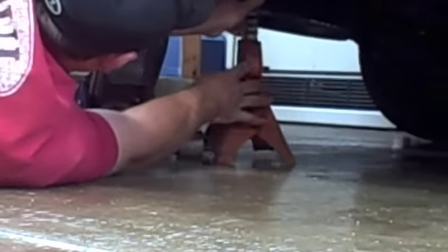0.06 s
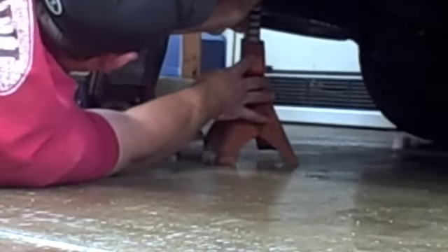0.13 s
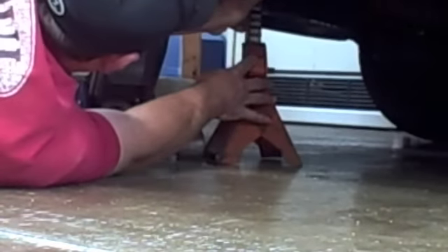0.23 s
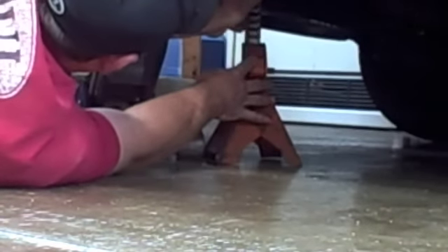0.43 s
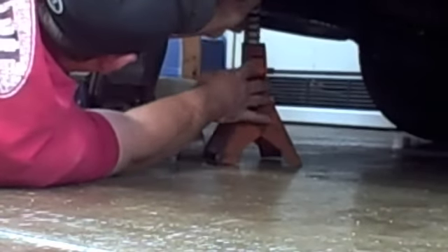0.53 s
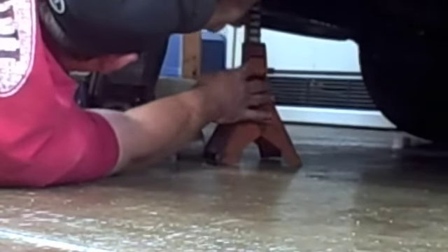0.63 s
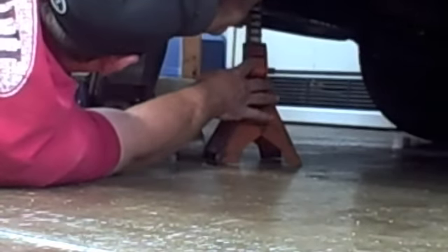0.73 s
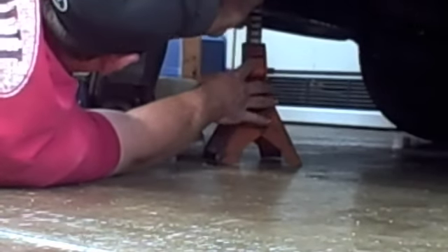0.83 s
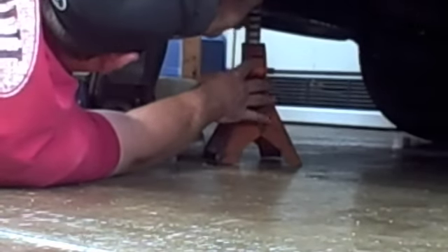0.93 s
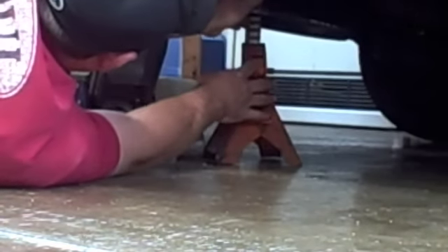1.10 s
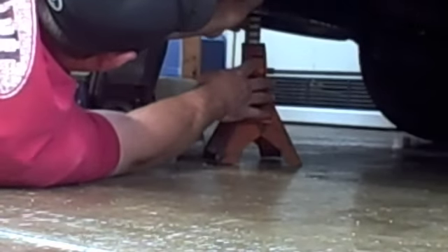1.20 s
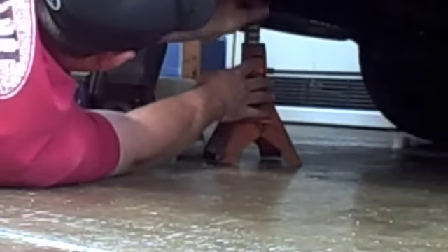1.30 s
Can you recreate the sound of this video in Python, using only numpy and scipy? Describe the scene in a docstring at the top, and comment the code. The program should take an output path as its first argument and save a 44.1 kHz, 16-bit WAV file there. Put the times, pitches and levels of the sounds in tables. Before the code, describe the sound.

Close, slightly distorted sound of a metal stand adjusted by hand in an echoing garage: foot knock, short groan and pawl clicks, a harsh ringing clank, then gritty scuffs, faint squeaks and a final knock.

```python
"""A concrete garage: a steel jack stand is set on the floor by hand, beside a microphone that overloads.
The pawl clicks, the notched post drops with one loud rattling clank, and the frame knocks and scuffs
on the floor as it is nudged into place. Steel parts ring as sums of decaying modes; clatter, thuds,
slides and scuffs are shaped noise; squeaks and groans are wavering tones. Decaying noise forms the
garage's reflections, which ring on over a quiet room tone."""
import sys
import numpy as np
from scipy import signal
from scipy.fft import rfft, irfft
from scipy.io import wavfile
from scipy.ndimage import uniform_filter1d

SR = 44100
rng = np.random.default_rng(int(sys.argv[2]) if len(sys.argv) > 2 else 0)


def master(y):
    """Save y as 16-bit WAV."""
    cut = np.clip(np.atleast_2d(y).T, -1, 1)
    pcm = np.round(cut * 32767)  # scale
    wavfile.write(sys.argv[1], SR, pcm.astype(np.int16))


N = 59535
TIME, HZ = np.arange(N) / SR, np.fft.rfftfreq(N, 1 / SR)


def amp(db):
    """Decibels to gain."""
    return 10 ** (np.asarray(db) / 20)


def unit(x):
    """Scales to rms 1."""
    return x / np.sqrt(np.mean(x ** 2) + 1e-20)


def read(points, hz):
    """Reads a table on a log-frequency axis."""
    f, value = np.transpose(points)
    return np.interp(np.log(hz + 1), np.log(f + 1), value)


def add(mix, start_s, sound):
    """Mixes a sound in at its start time."""
    part = mix[max(round(start_s * SR), 0):][:len(sound)]
    part += sound[:len(part)]


def noise(spectrum, tilt_db=0):
    """Random-phase noise of rms 1 with the given spectrum, tilted per octave above 500 Hz."""
    tilt = tilt_db * np.log2(np.maximum(HZ, 500))
    gain = amp(read(spectrum, HZ) + tilt)
    phase = 2 * np.pi * rng.random(len(HZ))
    return unit(irfft(gain * np.exp(1j * phase), N))


def fade(t, t60):
    """Free decay, 60 dB in t60 seconds."""
    return np.exp(-np.log(1000) * t / np.maximum(t60, 1e-3))


def die_away(x, t60s):
    """Lets each frequency band decay at its own speed."""
    hz, t, bands = signal.stft(x, SR, nperseg=256)
    bands = bands * fade(t, read(t60s, hz)[:, None])
    return signal.istft(bands, SR, nperseg=256)[1][:N]


def stroke(start_s, length_s):
    """The swell and fall of one short push."""
    progress = np.clip((TIME - start_s) / length_s, 0, 1)
    return np.sqrt(np.abs(np.sin(np.pi * progress)))


# Background of the empty garage: freq_hz, level_db (relative, per Hz)
AIR_SPECTRUM = [(25, -14.5), (70, -6), (300, 5), (700, -12), (2500, -12), (6000, -21.5), (15000, -24)]
AIR_DB = -59


def room_tone():
    """Steady noise with the spectrum of the garage's air."""
    return amp(AIR_DB) * noise(AIR_SPECTRUM)


# How long the garage rings on: freq_hz, t60_s
GARAGE_DECAY = [(80, 0.13), (200, 0.87), (400, 0.72), (1000, 0.6), (2700, 0.71), (5000, 0.56), (9000, 0.37),
                (15000, 0.4)]
ROOM_DELAY_S = 0.0058  # middle of the reflections' fade-in


def garage(x):
    """Dense reflections off concrete walls and the car's underside."""
    onset = np.clip(TIME / ROOM_DELAY_S - .5, 0, 1)
    tail = die_away(rng.standard_normal(N), GARAGE_DECAY) * onset
    return signal.fftconvolve(x, tail / np.linalg.norm(tail))[:N]


# The base dragging over grit: start_s, length_s, level_db
SCUFF_STROKES = [(0.175, 0.11, -37), (0.486, 0.11, -48), (0.681, 0.066, -38), (0.735, 0.108, -43.5),
                 (0.851, 0.23, -45)]
# Colour of the scrape: freq_hz, level_db (relative, per Hz)
SCUFF_SPECTRUM = [(30, -19.5), (70, -9.5), (130, -10.5), (190, -1.5), (350, -1), (600, -6.5), (1200, -10),
                  (4000, -22), (12000, -35.5)]
GRIT_PER_S = 2200


def scuffs():
    """Random grains of grit under the base make a dull scrape."""
    grit = rng.standard_normal(N) * (rng.random(N) < GRIT_PER_S / SR)
    scrape = unit(irfft(rfft(grit) * amp(read(SCUFF_SPECTRUM, HZ)), N))
    pushes = sum(amp(db) * stroke(start_s, length_s) for start_s, length_s, db in SCUFF_STROKES)
    return scrape * pushes


# The post sliding in its sleeve: start_s, length_s, level_db, brightness_db_per_octave
SLIDE_STROKES = [(0.058, .085, -43.5, -3), (0.15, 0.071, -34.5, -3.5), (0.186, 0.016, -29, -1),
                 (0.233, 0.093, -42.5, -2), (0.901, 0.078, -49.5, -2)]
# The crowd of short-lived steel modes, also heard in the clanks: freq_hz, level_db (relative, per Hz)
CLATTER_SPECTRUM = [(100, -39.5), (450, -9.5), (800, -2.5), (1050, -9.5), (1500, -5), (2600, -3),
                    (3700, -2), (4700, -6.5), (7000, -10), (10000, -16.5), (15500, -28.5)]


def slides():
    """Steel rubbing on steel keeps the crowd of short modes rustling."""
    out = np.zeros(N)
    for start_s, length_s, level_db, tilt_db in SLIDE_STROKES:
        out += amp(level_db) * stroke(start_s, length_s) * noise(CLATTER_SPECTRUM, tilt_db)
    return out


def stick_slip(rows, width_hz, waver):
    """Rubbing locks onto one mode, which wavers in pitch and rings on briefly."""
    out, r = np.zeros(N), np.exp(-np.pi * width_hz / SR)
    for start_s, length_s, pitch_hz, level_db in rows:
        drift = unit(uniform_filter1d(rng.standard_normal(N), size=100))
        turns = np.cumsum(pitch_hz * (1 + waver * drift)) / SR
        swell = signal.lfilter([1 - r], [1, -r], stroke(start_s, length_s))
        out += amp(level_db) * swell * np.sin(2 * np.pi * turns)
    return np.sqrt(2) * out


# Steel rubbing until one of the frame's modes groans: start_s, length_s, pitch_hz, level_db
GROAN_SLIPS = [(0.157, 0.013, 935.6, -15.5), (0.18, 0.081, 932, -31), (0.184, 0.057, 1987, -27),
               (0.883, 0.0098, 910, -28.5), (0.883, .014, 821, -35.5), (0.922, 0.012, 850, -38)]


def groans():
    """Stick-slip on the frame's lower modes."""
    return stick_slip(GROAN_SLIPS, width_hz=19, waver=0.016)  # waver: rms fraction of pitch


# Thin squeaks and pings of steel rubbing on steel: start_s, length_s, pitch_hz, level_db
SQUEAK_SLIPS = [(0.068, 0.049, 3620, -43.5), (0.287, .006, 12800, -19), (0.700, 0.0062, 4220, -28.5),
                (0.735, 0.019, 4230, -43), (0.702, 0.015, 9700, -42.5), (0.791, 0.004, 3790, -23.5),
                (0.791, 0.019, 5050, -39.5)]


def squeaks():
    """Stick-slip on high modes, steadier in pitch than the groans."""
    return stick_slip(SQUEAK_SLIPS, width_hz=15, waver=0.0044)


ATTACK_S = .0008  # time constant of a steel blow
SHIMMER, SHIMMER_S = .33, .03  # rms depth and smoothing time of each mode's waver


def ring(freqs_hz, levels_db, t60s, blows):
    """Each blow (s, dB) adds energy to every mode of a steel part; each mode decays and wavers on its own."""
    out = np.zeros(N)
    for hz, level_db, t60 in zip(freqs_hz, levels_db, t60s):
        energy = np.zeros(N)
        response = ((1 - np.exp(-TIME / ATTACK_S)) * fade(TIME, t60)) ** 2
        for start_s, blow_db in blows:
            add(energy, start_s, amp(blow_db) ** 2 * response)
        size = max(round(SHIMMER_S * SR), 2)
        a, b = uniform_filter1d(rng.standard_normal((2, N)), size=size)
        angle = 2 * np.pi * (hz * TIME + rng.random())
        in_phase = (1 + SHIMMER * unit(a)) * np.sin(angle)
        quadrature = SHIMMER * unit(b) * np.cos(angle)
        out += amp(level_db) * np.sqrt(energy) * (in_phase + quadrature)
    return out / np.sqrt(np.sum(amp(levels_db) ** 2) / 2)


# The feet landing on concrete: start_s, clatter_db, brightness_db_per_octave, frame_ring_db
FOOT_KNOCKS = [(0.001, -24.5, 0.5, -27), (0.007, -27, -3, -56), (0.641, -36, -1.5, -65),
               (0.671, -30, 2.5, -30.5), (0.791, -36, 0.5, -38), (0.9405, -22.5, 0, -25.5),
               (0.947, -43.5, -5.5, -39.5)]
# Short-lived modes when a foot lands: freq_hz, level_db (relative, per Hz); then freq_hz, t60_s
FOOT_SPECTRUM = [(25, -39), (100, -19.5), (450, -15), (850, -1.5), (1050, -10.5), (1450, -5), (2000, -1),
                 (2600, 1), (3200, -3), (4100, -7.5), (5000, -10.5), (7000, -17.5), (10000, -23.5),
                 (15500, -30)]
FOOT_DECAY = [(300, 0.18), (1500, 0.099), (4000, 0.15), (9000, 0.17), (15000, 0.066)]
# Modes of the four-legged frame, one column each: freq_hz; level_db (relative); t60_s
FRAME_FREQS = [848, 899, 938, 1182, 1297, 1650, 1690, 1860, 2003, 2022, 2515, 2545, 2846, 3531, 4037, 5782,
               6420, 7058, 8489]
FRAME_LEVELS = [-5, -11.5, -8.5, -7, -14.5, -9.5, -16, -9, -1, -0.5, -2.5, -11.5, -12.5, -13, -16, -15.5,
                -17.5, -21, -23]
FRAME_DECAYS = [0.22, 0.42, 0.29, 0.31, 0.67, 0.29, 0.31, 0.24, .17, 0.27, 0.2, 0.19, .28, 0.62, .33, .33,
                0.31, 0.39, .38]
KNOCK_ATTACK_S = 0.0012


def knocks():
    """Feet landing on the floor give blunt clatter and ring the frame; returns clatter and ring."""
    clatter, blows = np.zeros(N), []
    blunt = 1 - np.exp(-TIME / KNOCK_ATTACK_S)
    for start_s, clatter_db, tilt_db, frame_db in FOOT_KNOCKS:
        burst = die_away(noise(FOOT_SPECTRUM, tilt_db), FOOT_DECAY)
        add(clatter, start_s, blunt * amp(clatter_db) * burst)
        blows.append((start_s, frame_db))
    return clatter, ring(FRAME_FREQS, FRAME_LEVELS, FRAME_DECAYS, blows)


# The post and pawl striking inside the frame:
# start_s, clatter_db, brightness_db_per_octave, post_ring_db, pawl_ring_db, thud_db
CLANK_BLOWS = [(0.158, -42.5, 10.5, -38, -55, -55.5), (0.200, -23, 3.5, -33, -22.5, -62),
               (0.206, -34, 0, -43.5, -24.5, -54), (0.236, -42.5, -21, -28, -54, -57),
               (0.289, -27.5, -4, -50, -22.5, -38), (0.293, -8, 2, -6, -21.5, -30),
               (0.32, -29.5, -2.5, -42, -31.5, -56), (0.329, -20.5, 1.5, -14, -52.5, -47.5),
               (0.533, -38, -2, -37, -51, -66)]
# Decay of the short-lived steel modes: freq_hz, t60_s
CLATTER_DECAY = [(300, 0.16), (1500, 0.18), (4000, .15), (9000, .12), (15000, 0.15)]
# The floor's thud: freq_hz, level_db (relative, per Hz)
THUD_SPECTRUM = [(25, -5.5), (45, -4), (80, -1.5), (130, -7), (250, 2), (450, -8), (1000, -28.5),
                 (4000, -65)]
THUD_T60_S = 0.083
# Modes of the notched post, one column each: freq_hz; level_db (relative); t60_s
POST_FREQS = [608, 900, 925, 1184, 1351, 1688, 1852, 1993, 2038, 2078, 2445, 2471, 2498, 2563, 2713, 2885,
              3074, 3206, 3707, 3803, 4463, 5012, 5191, 6158, 6415, 6918, 7047, 7246, 8145, 8398]
POST_LEVELS = [-16.5, -9, -8, -2.5, -14, -1, -9, 2.5, -7.5, -13, 1, -3.5, -12.5, -4, -12, -5, -11, -3.5, -5,
               -8, -19, -9, -10.5, -11, -14, -17.5, -19.5, -22, -9.5, -19]
POST_DECAYS = [0.37, 0.3, 0.4, 0.15, 0.59, 0.33, 0.41, 0.13, 0.27, 0.28, 0.2, 0.42, 0.38, 0.3, .52, 0.38,
               .4, 0.22, 0.27, .25, .42, 0.25, 0.23, 0.32, 0.29, 0.44, 0.2, .45, .2, 0.28]
# Modes of the ratchet pawl, one column each: freq_hz; level_db (relative); t60_s
PAWL_FREQS = [3385, 3622, 4130, 4240, 5192, 6019, 6406, 6912, 8530, 9100, 9612]
PAWL_LEVELS = [-11, -5, -6, 3.5, -1, -3, -7, -6.5, -16, -12.5, -6.5]
PAWL_DECAYS = [0.13, 0.12, 0.17, 0.12, 0.22, .17, 0.15, .15, 0.13, .15, 0.12]


def clanks():
    """Blows ring the post and pawl, clatter, and thud through the floor; returns clatter and ring."""
    clatter, post_blows, pawl_blows = np.zeros(N), [], []
    sharp = 1 - np.exp(-TIME / ATTACK_S)
    for start_s, clatter_db, tilt_db, post_db, pawl_db, thud_db in CLANK_BLOWS:
        burst = die_away(noise(CLATTER_SPECTRUM, tilt_db), CLATTER_DECAY)
        thud = noise(THUD_SPECTRUM) * fade(TIME, THUD_T60_S)
        add(clatter, start_s, sharp * amp(clatter_db) * burst)
        add(clatter, start_s, sharp * amp(thud_db) * thud)
        post_blows.append((start_s, post_db))
        pawl_blows.append((start_s, pawl_db))
    post = ring(POST_FREQS, POST_LEVELS, POST_DECAYS, post_blows)
    pawl = ring(PAWL_FREQS, PAWL_LEVELS, PAWL_DECAYS, pawl_blows)
    return clatter, post + pawl


CLATTER_ROOM_DB, RING_ROOM_DB = -5.5, -14  # sends to the garage's reflections


def scene():
    """The stand, the garage and its room tone."""
    knock_clatter, frame_ring = knocks()
    clank_clatter, post_pawl_ring = clanks()
    noisy = knock_clatter + clank_clatter + scuffs() + slides()
    tonal = frame_ring + post_pawl_ring + groans() + squeaks()
    echo = garage(amp(CLATTER_ROOM_DB) * noisy + amp(RING_ROOM_DB) * tonal)
    return (noisy + tonal + echo + room_tone())[None]


CEILING, EDGE_HZ = .78, 15850  # overload ceiling (fraction of full scale), top of the band


def record(dry):
    """The microphone's soft overload, then the band limit."""
    squashed = CEILING * np.tanh(dry / CEILING)
    lowpass = signal.firwin(511, EDGE_HZ, window=("kaiser", 9), fs=SR)
    return signal.oaconvolve(squashed, lowpass[None], "same")


dry = scene()
out = record(dry)
master(out)
```